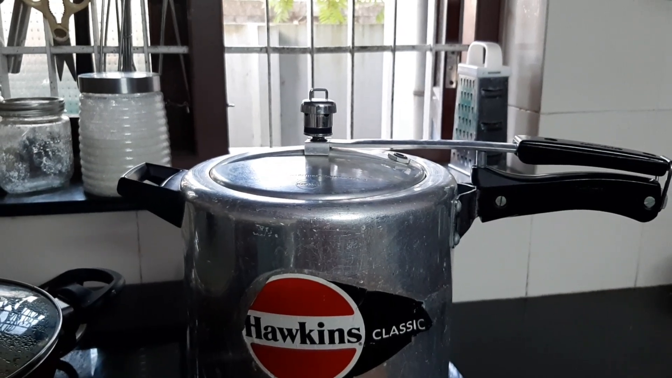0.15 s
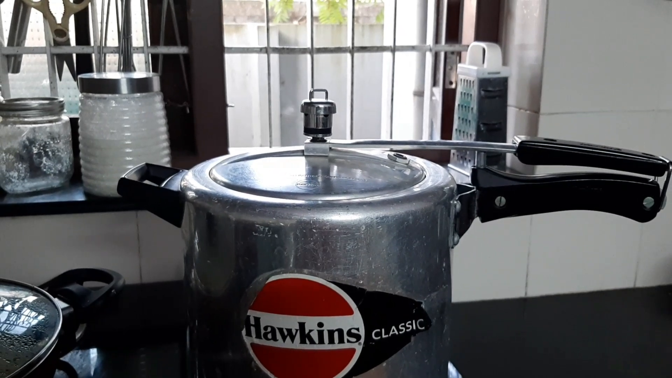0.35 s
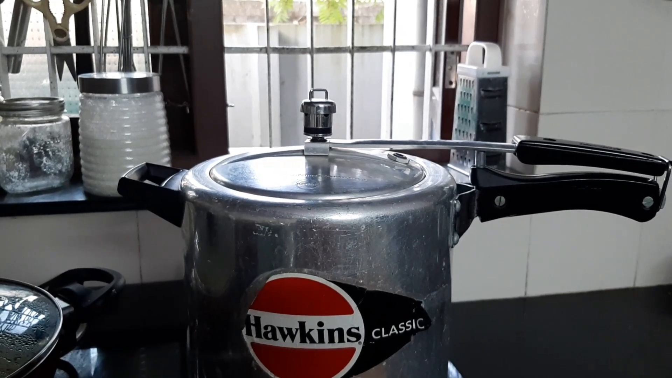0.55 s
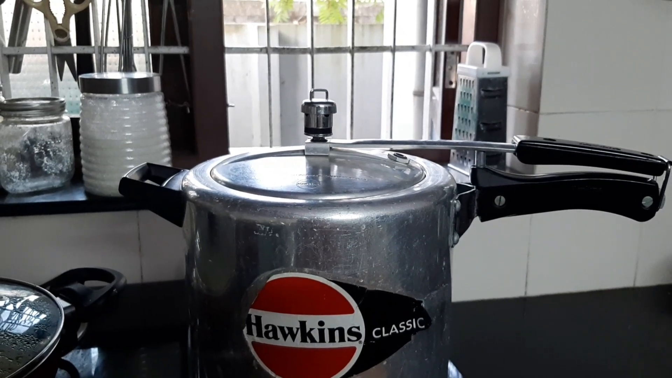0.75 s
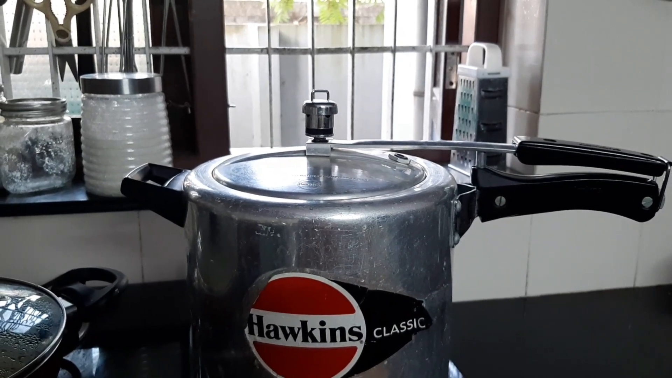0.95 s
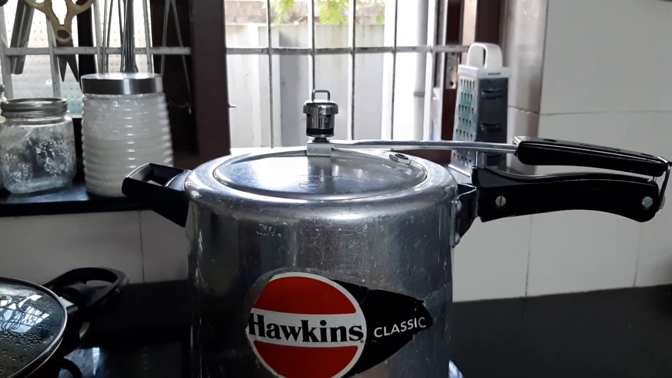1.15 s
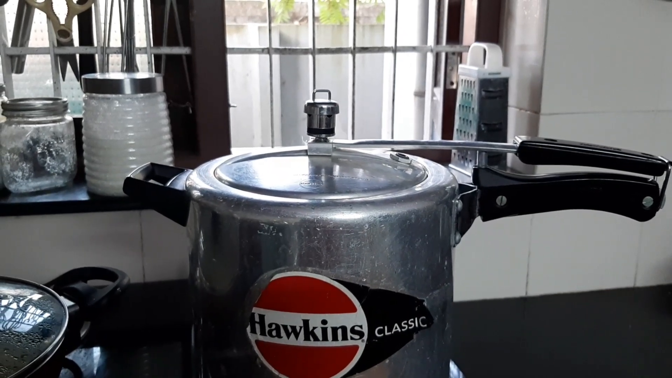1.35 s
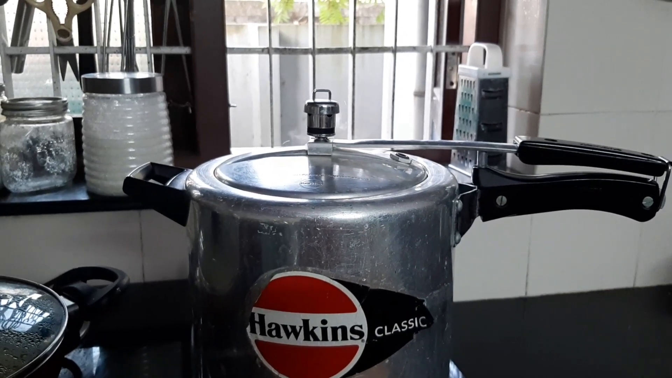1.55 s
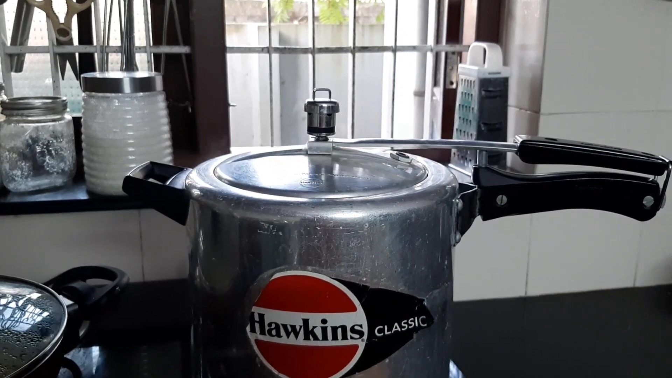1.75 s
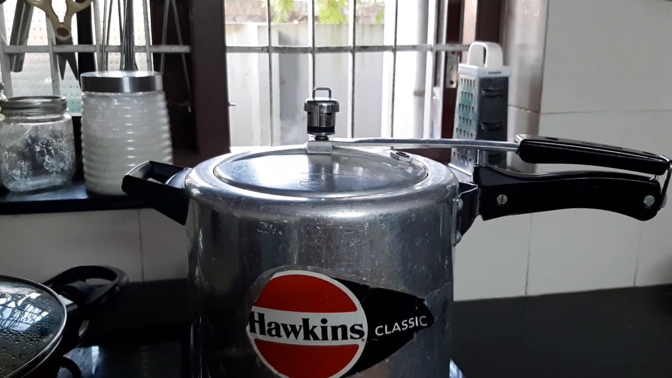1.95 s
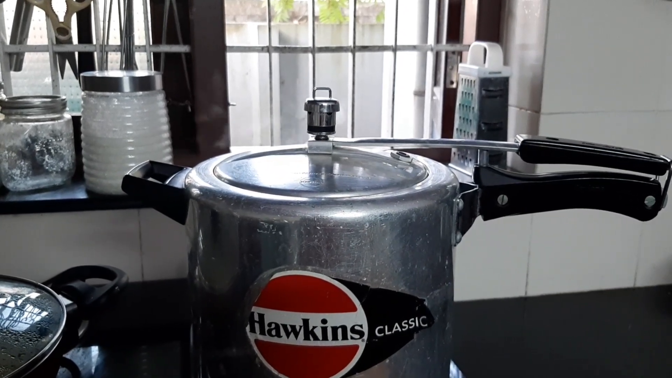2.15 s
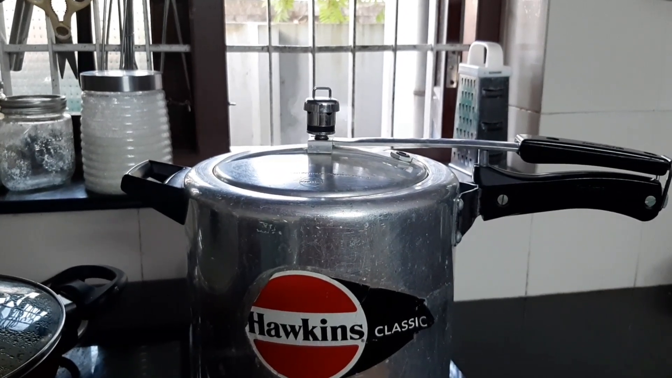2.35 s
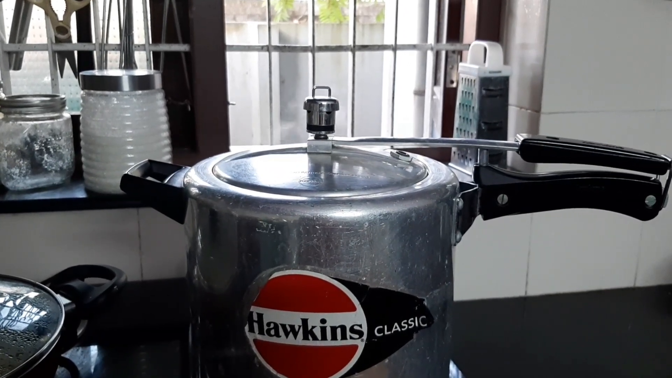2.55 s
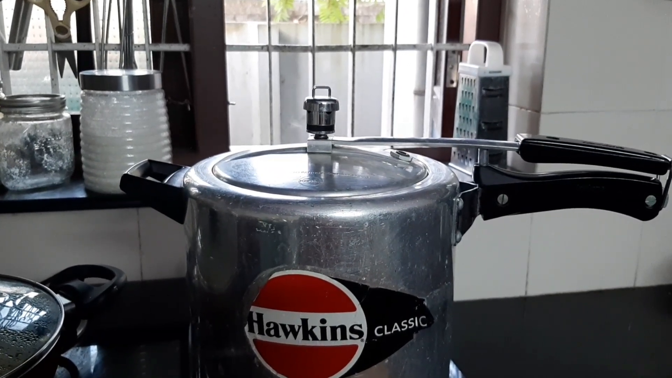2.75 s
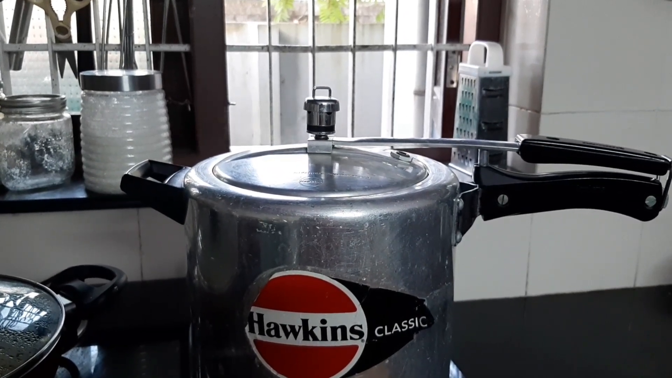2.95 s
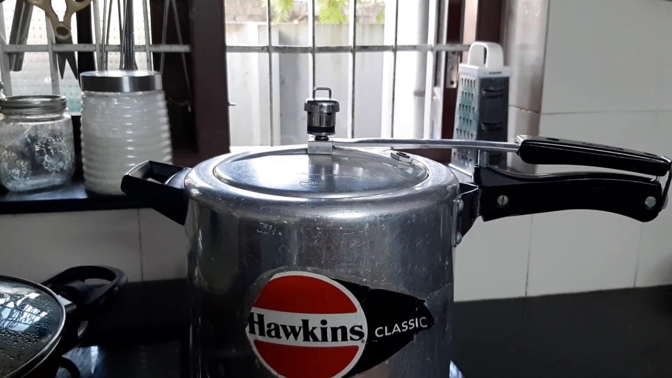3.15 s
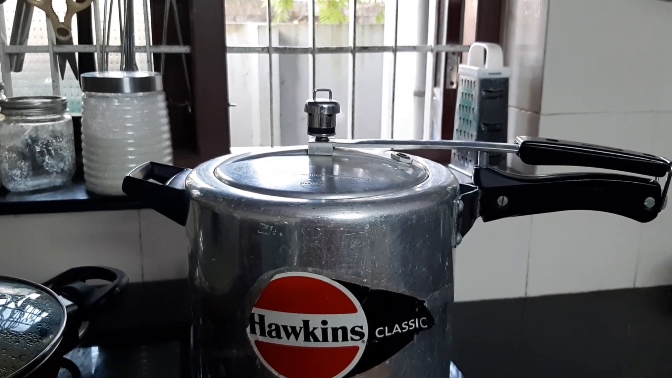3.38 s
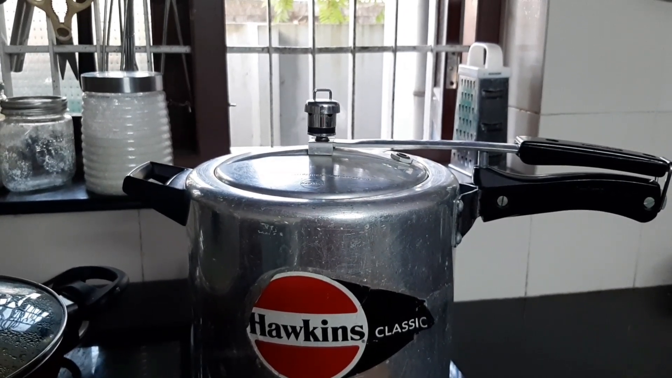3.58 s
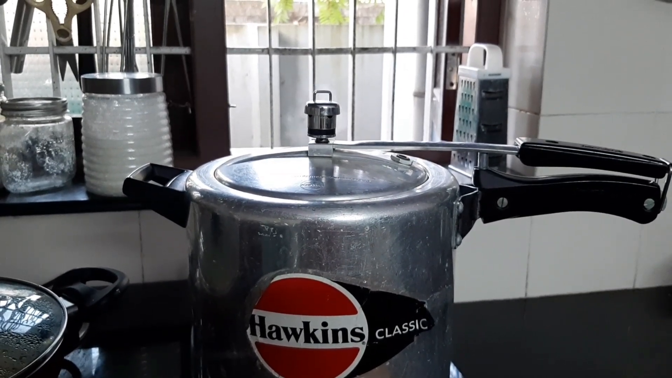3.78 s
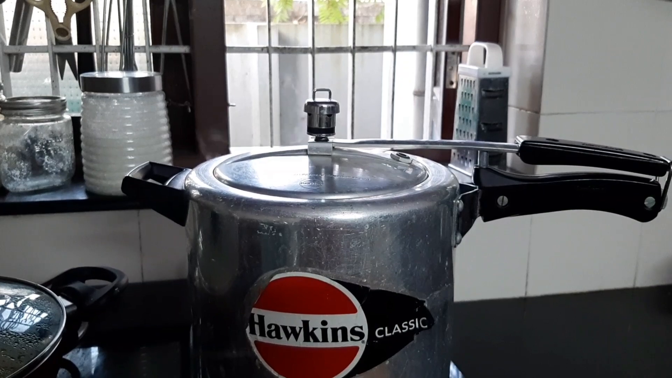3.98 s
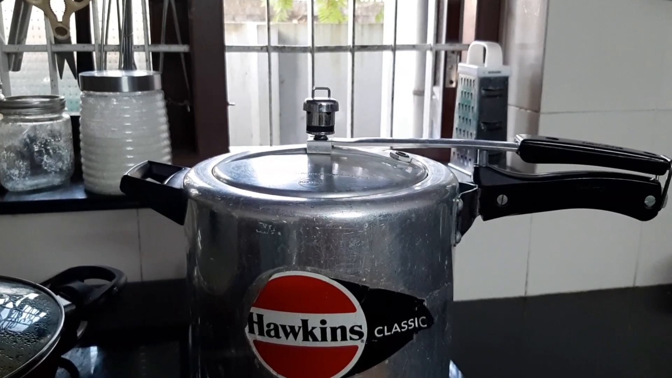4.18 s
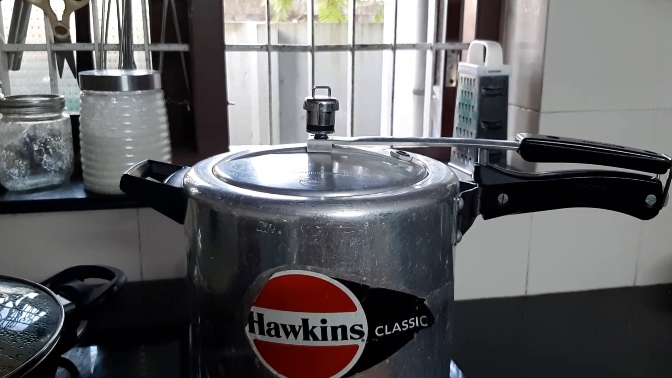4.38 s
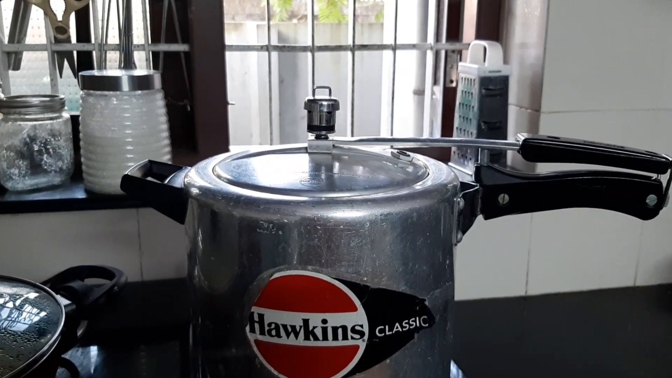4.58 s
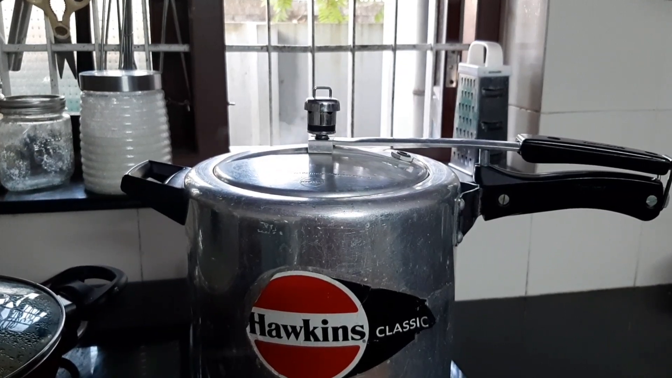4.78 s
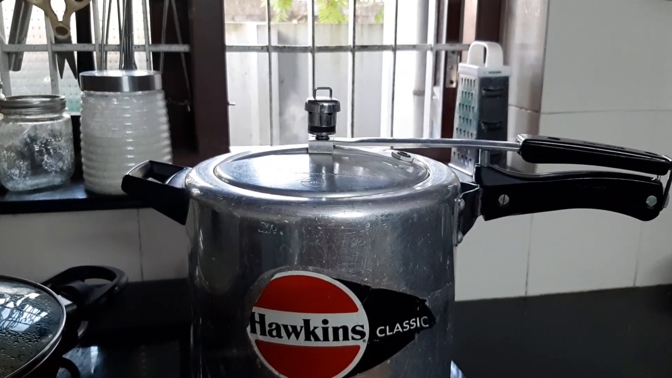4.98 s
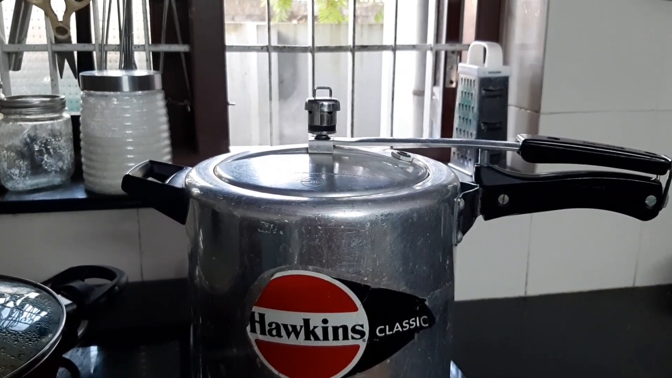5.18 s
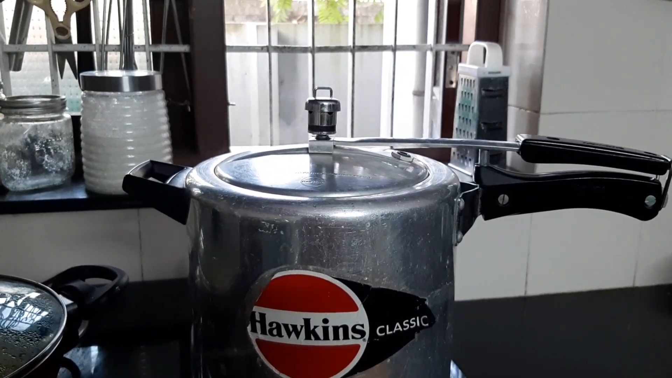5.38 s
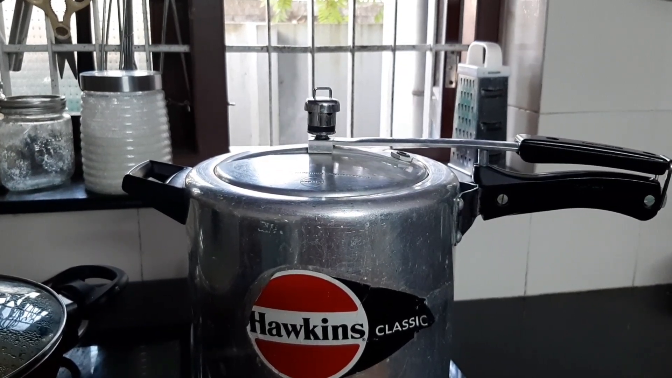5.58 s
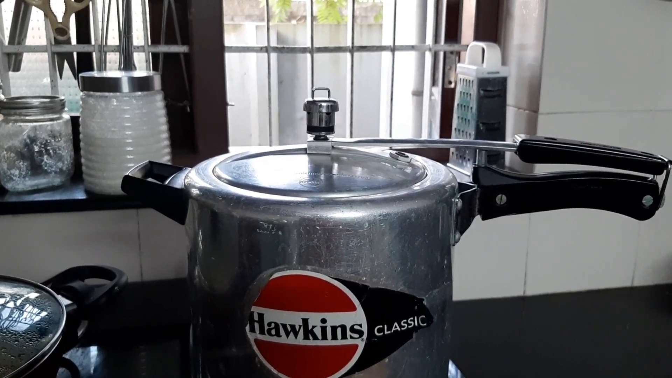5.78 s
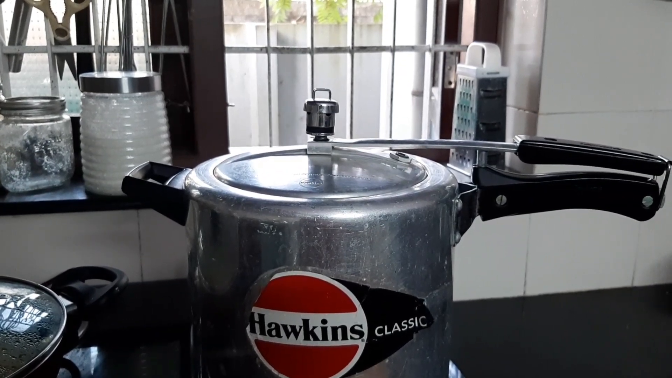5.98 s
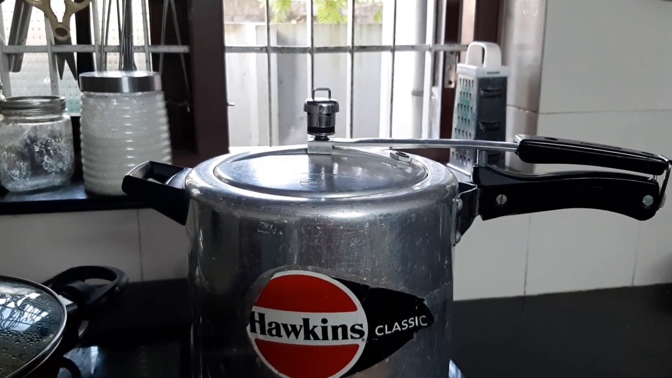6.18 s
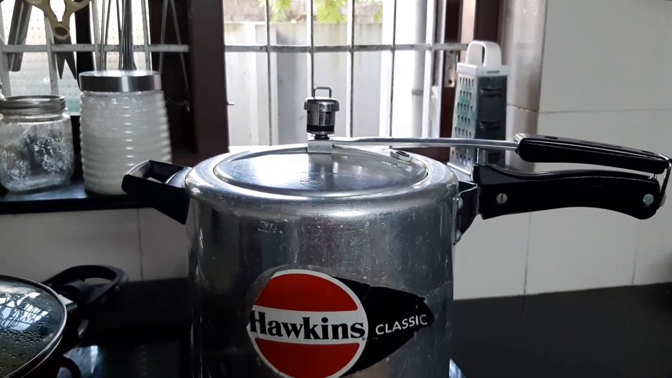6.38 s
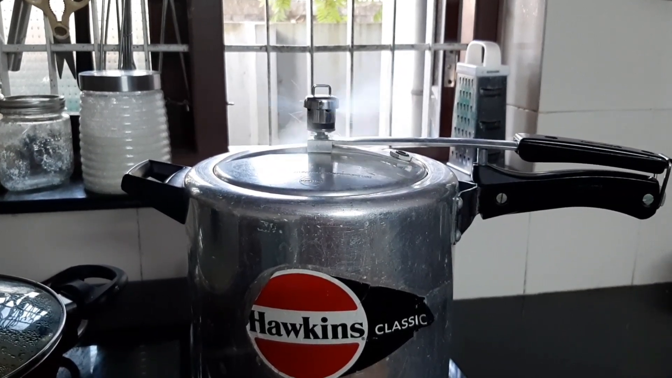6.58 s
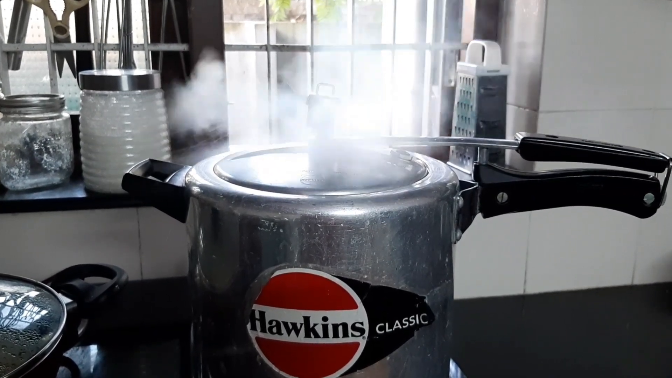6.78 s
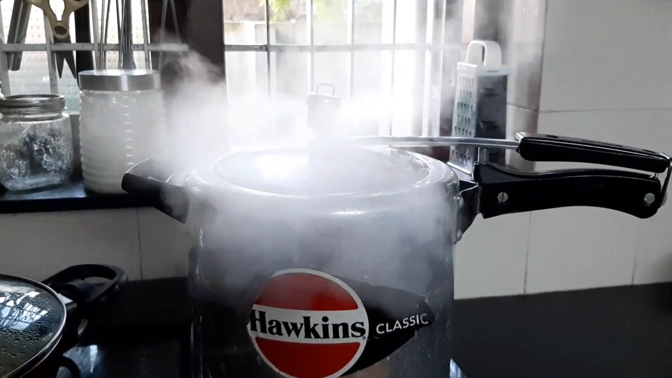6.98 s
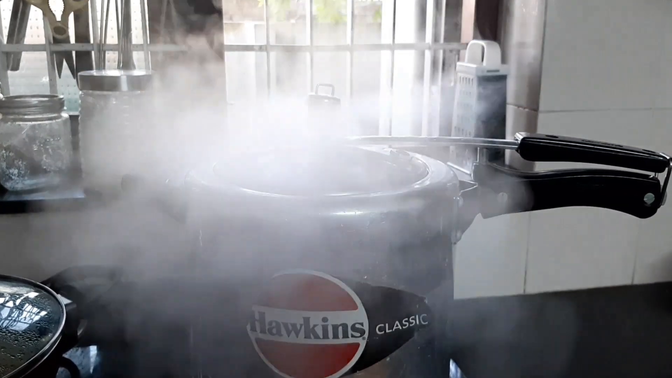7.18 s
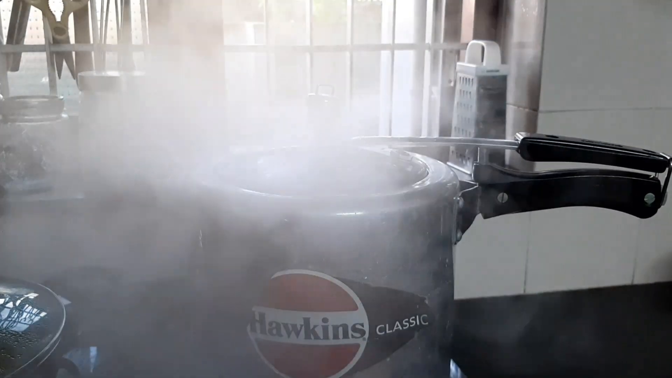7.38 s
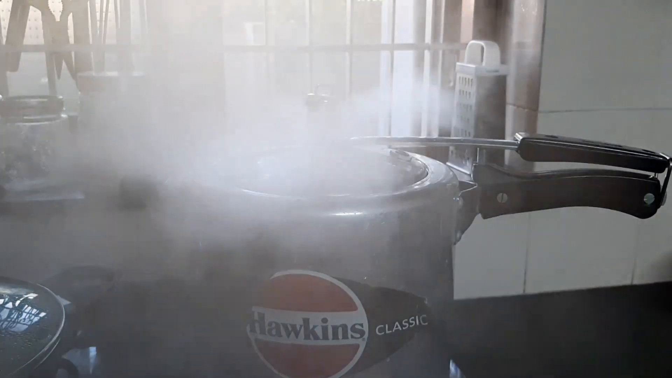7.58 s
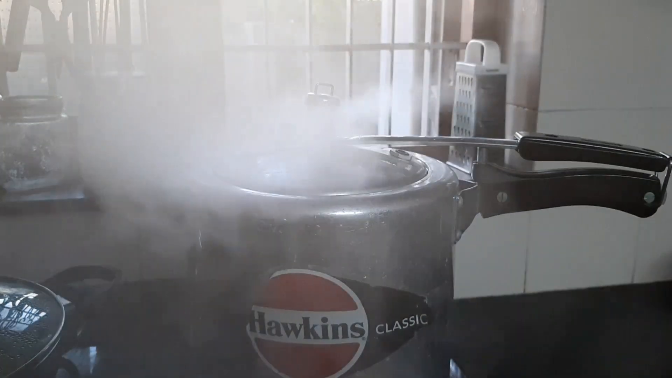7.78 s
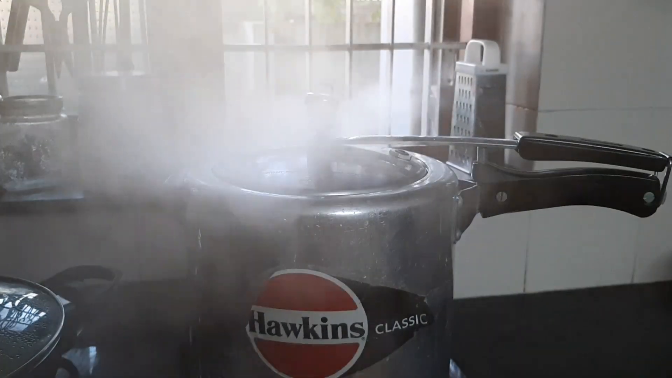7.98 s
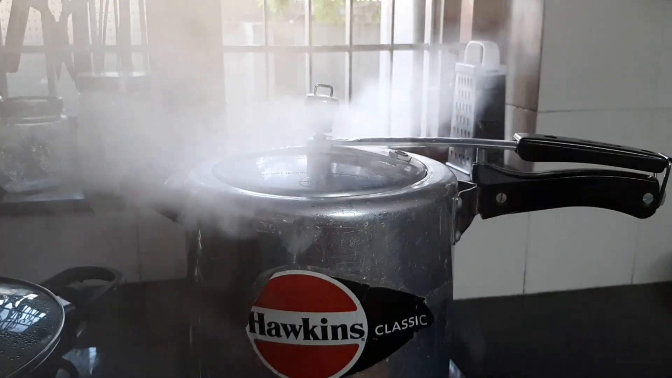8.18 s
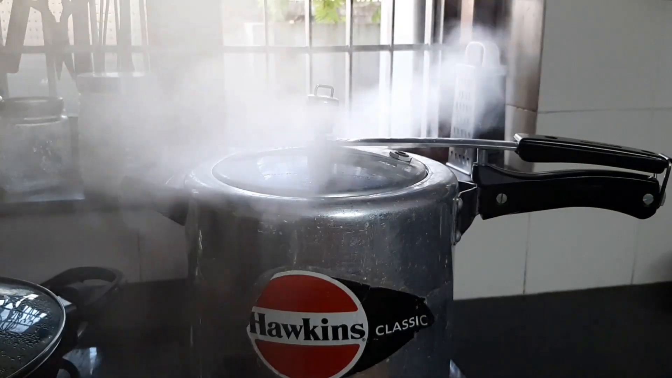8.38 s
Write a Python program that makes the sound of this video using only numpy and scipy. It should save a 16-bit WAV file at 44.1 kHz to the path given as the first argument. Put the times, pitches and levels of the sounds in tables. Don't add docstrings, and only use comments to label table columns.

```python
import sys
import numpy as np
from scipy import signal
from scipy.fft import rfft, irfft, next_fast_len
from scipy.io import wavfile
from scipy.ndimage import uniform_filter1d, map_coordinates

SR = 44100
rng = np.random.default_rng(int(sys.argv[2]) if len(sys.argv) > 2 else 0)


def boost_factor(decibels):
    exponent = np.asarray(decibels, float) / 20
    return 10 ** exponent


def log_audio(samples):
    frames = np.atleast_2d(samples).T
    limited = np.clip(frames, -1, 1)
    pcm = np.round(limited * 32767).astype(np.int16)
    wavfile.write(sys.argv[1], SR, pcm)


N = 372204

# [f/Hz, level per Hz/dB]
CAP_COLOUR = [(800, -90), (2200, -26), (2750, -30.5), (4000, -9.5), (5200, -2.5), (5800, 0), (6350, 0.5),
              (6950, -1.5), (7500, -15.5), (9500, -41)]
# [f/Hz, level per Hz/dB]
FIZZ_COLOUR = [(3000, -90), (6000, -6.5), (7500, 2), (9000, -5.5), (10500, -1), (11350, 3), (11650, 5),
               (12000, 4.5), (13300, 4), (14500, 2), (15750, 0.5)]
# [f/Hz, level per Hz/dB]
ROAR_COLOUR = [(30, -80), (150, -38), (400, -18), (1100, -9), (1300, -9.5), (1700, -6), (2080, -5.5),
               (2500, -4.5), (2800, 1), (3800, 2.5), (5000, -0.5), (7000, -25), (9500, -5), (10500, -8),
               (13000, -36)]
# [t/s, peak level/dB]
SPITS = [(.488, -25), (.772, -27), (.892, -30), (1.034, -17), (1.497, -29), (1.5638, -22), (1.6064, -9.5),
         (1.73, -16), (1.7968, -30), (2.02, -24), (2.088, -23), (2.366, -21), (2.5217, -21), (2.6524, -22),
         (2.885, -24), (3.1203, -30), (3.775, -25), (3.8511, -23), (4.7092, -28), (4.7626, -27),
         (4.9462, -30), (5.0539, -28), (5.3637, -24), (5.8262, -30), (5.8651, -24), (5.902, -12),
         (6.4233, -24), (6.4467, -18), (6.563, -15), (6.929, -6)]
# [t/s, cap hiss level/dB, half-length/s]
LEAK_SWELLS = [(.52, -42.5, 0.078), (.8, -43.5, 0.047), (1.13, -42, 0.11), (1.48, -41, 0.17),
               (1.77, -40, 0.089), (2.04, -41.5, 0.037), (2.22, -42, 0.21), (2.53, -41.5, 0.055),
               (2.69, -41, 0.12), (2.9, -50, 0.044), (3.2, -40, 0.064), (3.4, -44.5, 0.2),
               (3.83, -44.5, 0.18), (4.1, -42, 0.06), (4.645, -46, .05), (4.97, -42, 0.024),
               (5.27, -43.5, 0.095), (5.64, -42.5, 0.054)]
# [t/s, cap hiss level/dB, half-length/s, opening/0-1]
ROCKS = [
    (4.45, -39.5, 0.059, 0.1),
    (4.758, -36, 0.055, .03),
    (5.092, -37, .05, .03),
    (5.399, -35, 0.043, 0),
    (5.689, -37.5, 0.025, .02),
    (5.923, -33.5, 0.065, .6),
    (6.132, -42.5, 0.074, 0.36),
    (6.29, -38, 0.088, 0.25),
]
# [t/s, cap hiss level/dB, widening of the jet/dB]
JET = [
    (6.36, -61, 1),
    (6.45, -41, -0.5),
    (6.575, -25.5, 0),
    (6.9, -25.5, 0),
    (7.02, -27, 3),
    (7.2, -29, 2),
    (7.92, -30, 3),
    (8.05, -28, 4),
    (8.44, -26, 1.5),
]
# [f/Hz, width/Hz, level/dB]
SPRAY = [
    (8000, 860, 2.5),
    (10300, 820, 3),
]
# [t/s, left minus right level/dB]
JET_TURN = [
    (0, 1),
    (5.5, 0.5),
    (6.6, -1),
    (8.44, -1.5),
]
# [f/Hz, share/0-1]
ALIKE = [(300, .8), (700, .75), (1500, .72), (3000, .68), (6500, .58), (9000, .5), (15000, .52)]
# [f/Hz, phase/radians]
LEAD = [(0, 0.5), (3010, 1.0), (3700, 1.5), (5510, 1), (5860, 1.5), (6370, 0.82), (8790, 3.5), (11300, 5),
        (11800, 7.5), (12300, 3.5), (12700, 1), (13600, -2.5), (13900, 0.5), (16500, 1.5)]
# [t/s, peak level/dB, f/Hz]
THUMPS = [
    (2.29, -54, 64.6),
    (6.649, -37, 186),
    (6.689, -45, 172),
    (6.72, -41, 194),
    (6.789, -50, 223),
    (6.999, -54, 183),
    (7.509, -45, 164),
    (8.019, -58, 161),
]
# [f/Hz, level per Hz/dB]
GUST_COLOUR = [(20, -25), (60, -9), (120, -0.5), (300, 1.0), (700, -3.5), (1500, -38)]
# [f/Hz, width/Hz, level/dB]
POT_WALL = [(144, 46, -5.5), (204.2, 11, -2.5), (223, 14, 3), (247, 20, -2), (275, 22, 2), (315, 20, 0),
            (349.4, 18.5, -1.5), (399, 16.4, -2), (449, 33, -5)]
# [f/Hz, width/Hz, level/dB]
POT_LID = [(493, 15, -2), (578, 44, -1.5), (657, 53, -2), (825, 93, 1.5), (916, 60, 1), (1055, 84, 0),
           (1220, 42, -2), (1420, 155, -4.5)]
# [t/s, level/dB, half-length/s]
SURGES = [(0.114, -61, 0.066), (0.468, -59.5, 0.038), (0.869, -55, 0.016), (1.017, -59.5, 0.07),
          (1.272, -56.5, 0.044), (1.729, -60.5, 0.3), (1.889, -57, 0.028), (2.138, -61, 0.031),
          (2.665, -55.5, 0.1), (2.978, -61, 0.038), (3.195, -59.5, 0.016), (3.384, -59, 0.085),
          (3.71, -59, 0.1), (3.894, -60, 0.021), (4.048, -59.5, 0.065), (4.554, -57.5, 0.099),
          (4.794, -63, 0.082), (5.008, -66, 0.073), (5.476, -62, 0.084), (5.648, -60.5, 0.071),
          (5.897, -57.5, 0.078), (6.257, -58, 0.034), (6.346, -62.0, 0.018), (6.504, -59, 0.053)]
# [t/s, level/dB, half-length/s]
RATTLES = [(0.086, -56, 0.026), (0.324, -58.0, 0.021), (0.481, -57, 0.041), (0.771, -57, 0.035),
           (1.019, -54.5, 0.046), (1.255, -52.5, 0.038), (1.682, -58, 0.29), (1.989, -56.0, 0.034),
           (2.191, -56, 0.11), (2.609, -54.5, 0.1), (2.874, -61, 0.026), (2.949, -54, 0.016),
           (3.265, -54.5, 0.145), (3.457, -53, 0.034), (3.767, -59, 0.18), (4.207, -59, 0.017),
           (4.462, -58, 0.088), (4.752, -57, 0.22), (5.326, -57, 0.058), (5.442, -57, 0.033),
           (5.66, -58.5, 0.089), (5.941, -55.5, 0.096), (6.219, -61, 0.25), (6.453, -54.5, 0.045)]
# [t/s, length/s, start f/Hz, level/dB, share of the pitch lost]
HIGH_NOTES = [
    (2.538, 0.093, 3315, -43, 0.018),
    (2.658, 0.072, 3310, -49, 0.011),
    (2.857, .07, 3130, -51, 0.023),
    (3.101, .12, 3180, -49, .06),
    (3.414, 0.073, 3360, -48, .03),
    (4.0, 0.155, 3390, -50, .01),
    (4.279, 0.157, 3380, -49, 0.016),
    (4.60, 0.12, 3246, -50, 0.037),
]
# [t/s, length/s, start f/Hz, fundamental level/dB, octave level/dB]
LOW_NOTES = [
    (2.66, 0.072, 2310, -62, -50),
    (2.906, .075, 2406, -53, -45.5),
    (3.2, 0.132, 2204, -61, -48),
    (3.493, 0.16, 2370, -61, -48),
    (3.753, 0.095, 2490, -52.5, -50),
    (3.86, 0.089, 2290, -60, -48),
    (4.088, 0.097, 2270, -61, -48),
    (4.358, 0.14, 2330, -59, -47),
    (4.689, .08, 2260, -58, -52),
]
# [f/Hz, level per Hz/dB]
RUMBLE_COLOUR = [(12, -48), (20, -22), (70, -2.5), (162, -10), (200, 6), (260, -23), (440, -120)]
# [t/s, level/dB, half-length/s]
PULLS = [
    (.3, -71, .25),
    (.87, -68, 0.12),
    (1.44, -65, 0.19),
    (2.16, -69, .22),
    (3.58, -69.5, .3),
    (4.05, -71, .14),
    (4.82, -72.5, .18),
]
# [f/Hz, time to fall 60 dB/s]
KITCHEN = [(200, 0.062), (2000, 0.53), (8000, 0.17), (15000, 0.13)]
# [f/Hz, left minus right level/dB]
PORTS = [(60, 3), (200, -0.5), (700, 1), (2000, 1.5), (3000, 3), (4500, 3.5), (6300, 4.5), (7000, 0),
         (7500, 3), (8000, -4.5), (8600, -5), (9600, -4), (11500, 0), (14200, 1)]

LIFT_S, LIFT_TAKES_S = 6.49, 0.18


def steam():
    cap_db, fizz_db, roar_db = valve()

    spit, t = np.zeros(N + SR), np.arange(SR // 5) / SR
    spit_t60_s, spit_rise_s = 0.022, 0.0031
    for s, db in SPITS:
        burst = boost_factor(db - 7.0 - 60 * t / spit_t60_s) * (1 - np.exp(-t / spit_rise_s)) ** 2 * 1.7
        spit[round(s * SR):][:len(t)] += burst
    spit = spit[:N]

    calm = np.clip((-36.5 - cap_db) / 8, .3, 1)
    flutter_db = calm * (0.31 * wobble(16) + 0.84 * wobble(45) + 1.7 * wobble(300))
    flow = boost_factor(cap_db + flutter_db) + spit

    cap = turbulence(CAP_COLOUR, patchy_db=1.93, count=3)
    fizz_level = boost_factor(fizz_db + 3.0 + 0.21 * wobble(12))
    fizz = fizz_level * turbulence(FIZZ_COLOUR, patchy_db=1.03, count=3)
    fizz *= (1 - spit / flow) ** .4
    roar_level = boost_factor(roar_db + 11.0 + 3.13 * lifted() + 0.44 * wobble(12))
    roar = roar_level * turbulence(ROAR_COLOUR, patchy_db=1.55, count=3)
    hiss = cap + fizz + roar

    linger = np.exp(-np.log(1e6) * t / 0.092)
    echo = np.sqrt(np.abs(signal.fftconvolve(flow ** 2, linger / linger.sum())[:N]))

    def alike(hz):
        return np.clip(along(ALIKE, hz), 0, 1)

    def near_ports(hz):
        lead = np.interp(hz, *np.transpose(LEAD))
        return np.sqrt(alike(hz)) * np.exp(np.outer([.5j, -.5j], lead))

    near = filtered(room(flow * hiss[0], wet_db=-3.0, lag=0), near_ports)
    return near + filtered(echo * hiss[1:], lambda hz: np.sqrt(1 - alike(hz)))


def valve():
    jet_db, widening_db = curves([(0, -93.5, JET[0][2])] + JET)
    narrow_rows, wide_rows = list(LEAK_SWELLS), []
    for s, db, half, opening in ROCKS:
        opening = np.clip(opening, .001, .999)
        narrow_rows.append((s, db + 10 * np.log10(1 - opening), half))
        wide_rows.append((s, db + 10 * np.log10(opening), half))
    seep = boost_factor(2 * -47)
    narrow = swells(narrow_rows)
    wide = swells(wide_rows) + boost_factor(2 * jet_db)

    def mix(seep_db, narrow_db, wide_db):
        power = seep * boost_factor(2 * seep_db) + narrow * boost_factor(2 * narrow_db) + wide * boost_factor(2 * wide_db)
        return 10 * np.log10(power)

    cap_db = mix(0, 0, 0)
    fizz_db = mix(-1.5, -4, 4 + 0.43 * widening_db) - cap_db
    roar_db = mix(-16, -24, -17 + widening_db) - cap_db
    return cap_db, fizz_db, roar_db


def lifted():
    return np.clip((np.arange(N) / SR - LIFT_S) / LIFT_TAKES_S, 0, 1)


def aimed_jet():
    turn = curves(JET_TURN)[0] / 2
    jet = steam() * boost_factor([turn, -turn])

    def shade(hz):
        return boost_factor(np.outer([-4.5, 1.5], np.exp(-((hz - 8000) / 600) ** 2)))

    def boosted(centre, width, db):
        return filtered(jet, lambda hz: boost_factor(db * np.exp(-((hz - centre) / width) ** 2)))

    wet, dry_steam = [boosted(*row) for row in SPRAY]
    dries_at_s, dries_in_s = 6.87, .12
    dried = 1 / (1 + np.exp((dries_at_s - np.arange(N) / SR) / dries_in_s))
    full_jet = dried * dry_steam + (1 - dried) * wet
    return lifted() * full_jet + (1 - lifted()) * filtered(jet, shade)


def draught():
    out, t = np.zeros((2, N + SR)), np.arange(SR // 8) / SR
    for (s, db, hz), share in zip(THUMPS, rng.random((len(THUMPS), 1))):
        late = t - .012
        push = np.sin(2 * np.pi * hz * late) * np.exp(-(late * hz * 2.4) ** 2)
        start = round(s * SR) - 500
        out[:, start:start + len(t)] += boost_factor(db + 8.5) * push * np.array([share, 1 - share])
    lumps = boost_factor(1.1 * np.array([wobble(16), wobble(16)]))
    gusts = unit(lumps * turbulence(GUST_COLOUR, patchy_db=1.5, count=2))
    stir_db, settles_s = 9.5, .3
    stir = stir_db * np.exp(-np.abs(np.arange(N) / SR - LIFT_S - .2) / settles_s)
    return out[:, :N] + lifted() * boost_factor(-55.5 + stir) * gusts


def boiling():
    simmer_db, lid_db = -64, -62
    surge = np.sqrt(boost_factor(2 * simmer_db) + swells(SURGES))
    rattle = np.sqrt(boost_factor(2 * lid_db) + swells(RATTLES))

    def knocks(per_second, spread_db):
        hits = rng.random(N) < per_second / SR
        return hits * rng.standard_normal(N) * boost_factor(spread_db * wobble(25))

    wall = unit(filtered(knocks(900, spread_db=1.3), modes(POT_WALL)))
    lid = unit(filtered(knocks(1500, spread_db=1.4), modes(POT_LID)))
    return boost_factor(1.5) * surge * wall + boost_factor(0.62) * rattle * lid


def bird():
    song, t = np.zeros((2, N + SR)), np.arange(SR // 4) / SR
    hoarse = 0.0205 * wobble(250)
    notes = [(s, length, hz, db, db - 28, fall) for s, length, hz, db, fall in HIGH_NOTES]
    notes += [tuple(row) + (.04,) for row in LOW_NOTES]
    for s, length, start_hz, db, octave_db, fall in notes:
        start, count = round(s * SR), round(length * SR)
        u = np.arange(count) / count
        warble = 1 + 0.0094 * np.sin(2 * np.pi * 45 * u * length) + hoarse[start:][:count]
        phase = 2 * np.pi * np.cumsum(start_hz * (1 - fall * u) * warble) / SR
        tone = boost_factor(db + 3.0) * np.sin(phase) + boost_factor(octave_db + 3) * np.sin(2 * phase)
        note = tone * np.sin(np.pi * u) ** 0.17
        yard = rng.standard_normal((2, len(t))) * boost_factor(-60 * t / 0.7)
        yard *= boost_factor(-2.0) / np.linalg.norm(yard[0])
        yard[:, 0] = 0.52
        heard = signal.fftconvolve(note[None], yard, axes=1)
        song[:, start:start + heard.shape[1]] += heard
    return song[:, :N]


def street():
    phase = 2 * np.pi * np.cumsum(68.5 + 2.44 * wobble(8)) / SR
    drone = np.sqrt(2) * np.sin(phase) * boost_factor(1.2 * wobble(12))
    idle_db = -80.5
    effort = np.sqrt(boost_factor(2 * idle_db) + swells(PULLS))
    return effort * drone + boost_factor(-68.0) * turbulence(RUMBLE_COLOUR, patchy_db=0.5)[0]


def room(x, wet_db, lag):
    hz, t, z = signal.stft(rng.standard_normal((2, SR // 2)), SR, nperseg=256)
    tail = signal.istft(z * boost_factor(-60 * t / along(KITCHEN, hz)[:, None]), SR, nperseg=256)[1]
    tail = tail / np.linalg.norm(tail, axis=1, keepdims=True)
    tail = np.pad(tail, ((0, 0), (90, 0)))
    wet = signal.fftconvolve(x[None], tail, axes=1)[:, :N]
    direct = filtered(x, lambda f: np.exp(np.outer([-1j, 1j], np.pi * f * lag / SR)))
    return (direct + boost_factor(wet_db) * wet) / np.sqrt(1 + boost_factor(2 * wet_db))


def turbulence(spectrum, patchy_db, count=1):
    z = signal.stft(rng.standard_normal((count, N)), nperseg=512)[2]
    field = uniform_filter1d(rng.standard_normal(z.shape[1:]), size=7, axis=0)
    field = uniform_filter1d(field, size=8, axis=1)
    noise = signal.istft(z * boost_factor(patchy_db * field / field.std()), nperseg=512)[1][:, :N]
    return unit(filtered(noise, lambda hz: boost_factor(along(spectrum, hz))))


def modes(table):
    def response(f):
        total = 0
        for k, (centre, width, db) in enumerate(table):
            damping = 1j * f * width
            total = total + (-1) ** k * boost_factor(db) * damping / (centre * centre - f * f + damping)
        return total
    return response


def swells(rows):
    coarse_s = np.arange(0, N + 44, 44) / SR
    power = sum(boost_factor(2 * db) * np.exp(-((coarse_s - s) / half) ** 2) for s, db, half in rows)
    return np.interp(np.arange(N) / SR, coarse_s, power)


def wobble(rate):
    coarse = np.arange(0, N + 16, 16)
    points = rng.standard_normal(int(N * rate / SR) + 4)
    return np.interp(np.arange(N), coarse, map_coordinates(points, [coarse * rate / SR]))


def curves(rows):
    s, *columns = np.transpose(rows)
    return [np.interp(np.arange(N) / SR, s, column) for column in columns]


def along(points, hz):
    f, value = np.transpose(points)
    return np.interp(np.log(hz + 1), np.log(f + 1), value)


def filtered(x, response):
    m = next_fast_len(N + SR // 2)
    return irfft(rfft(x, m) * response(np.fft.rfftfreq(m, 1 / SR)), m)[..., :N]


def unit(x):
    return x / np.sqrt(np.mean(x ** 2, axis=-1, keepdims=True) + 1e-20)


def scene():
    background = room(boiling(), wet_db=-16.5, lag=-7.5) + room(street(), wet_db=-23, lag=-.3) + bird()
    ducked = boost_factor(-5.5 * lifted())
    return aimed_jet() + ducked * background + draught()


def roll_off(x):
    return signal.sosfilt(signal.butter(12, 15730, fs=SR, output="sos"), x)


def record(dry):
    def port_response(hz):
        bass_cut = hz / np.hypot(hz, 25)
        return boost_factor(np.outer([.5, -.5], along(PORTS, hz))) * bass_cut

    return roll_off(filtered(dry, port_response))


dry = scene()
out = record(dry)
log_audio(out)
```